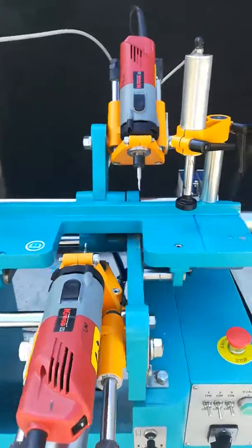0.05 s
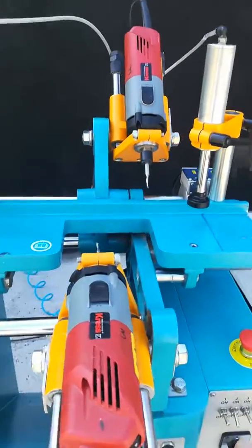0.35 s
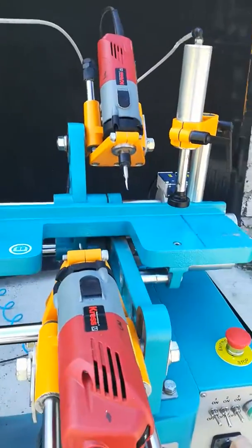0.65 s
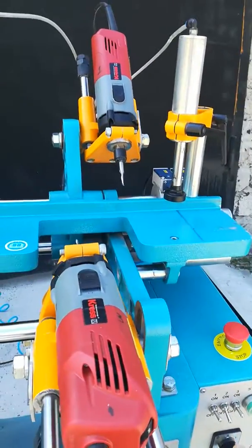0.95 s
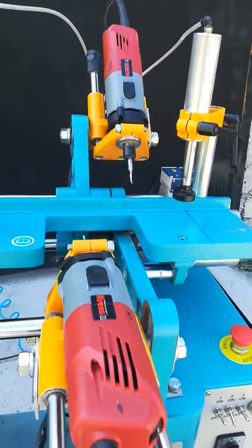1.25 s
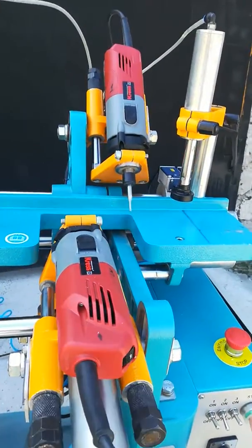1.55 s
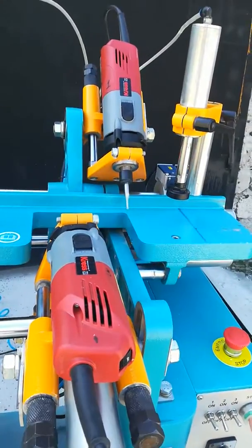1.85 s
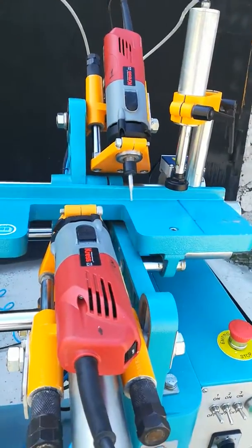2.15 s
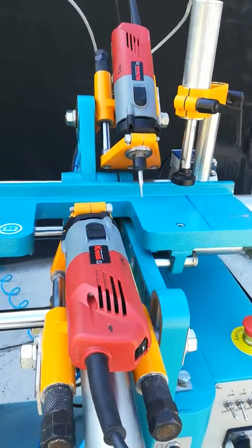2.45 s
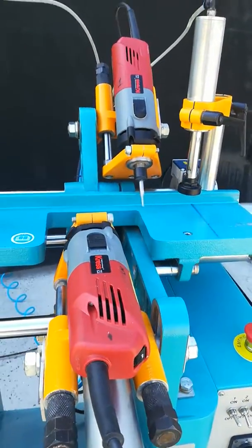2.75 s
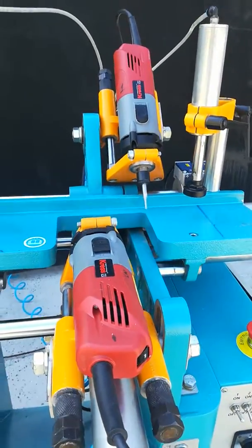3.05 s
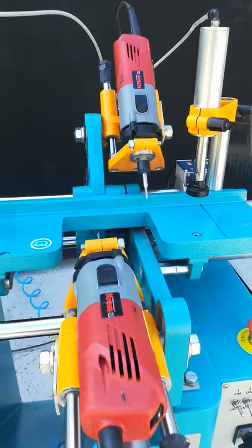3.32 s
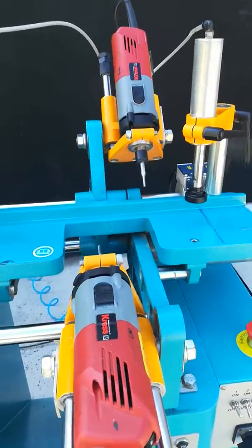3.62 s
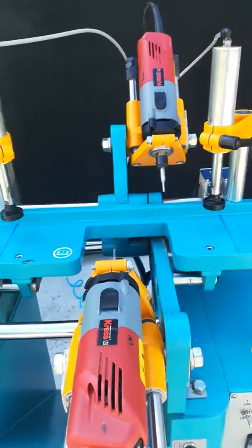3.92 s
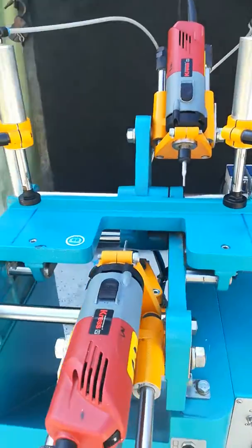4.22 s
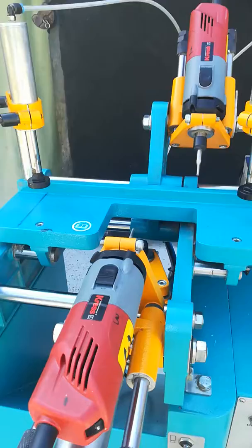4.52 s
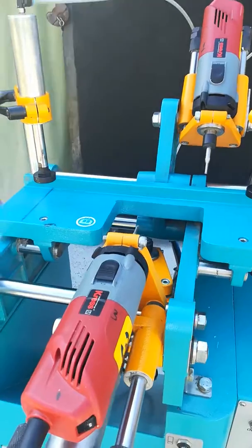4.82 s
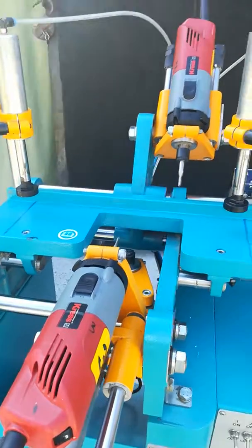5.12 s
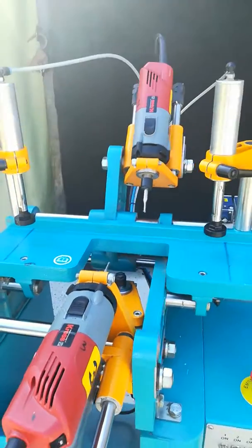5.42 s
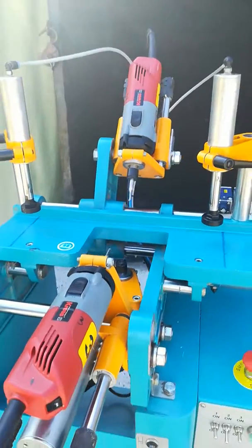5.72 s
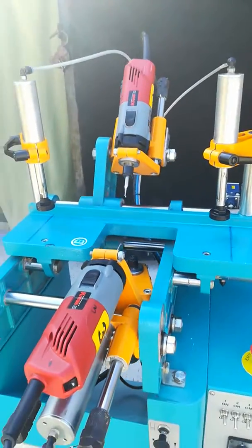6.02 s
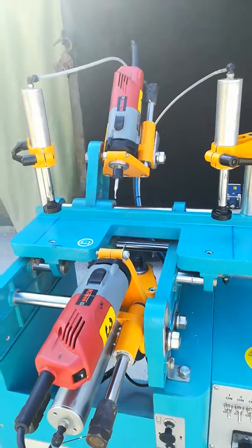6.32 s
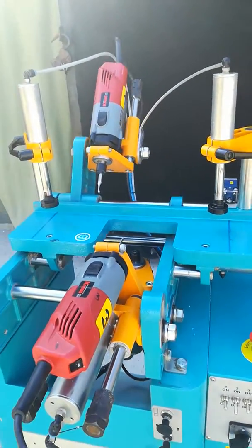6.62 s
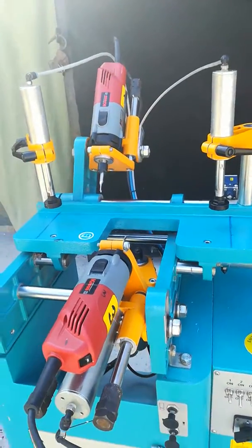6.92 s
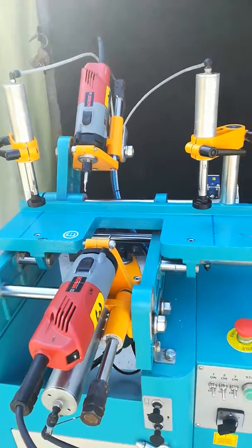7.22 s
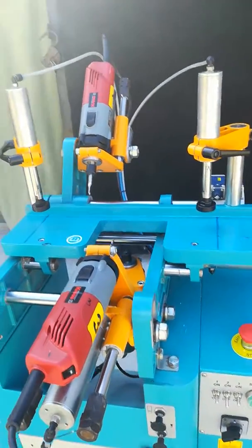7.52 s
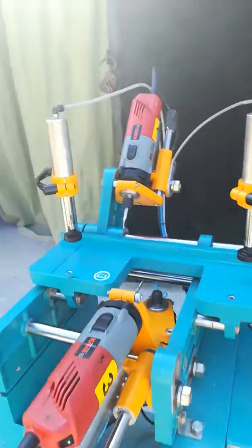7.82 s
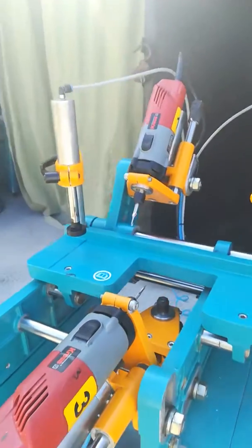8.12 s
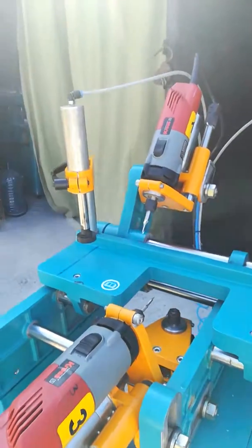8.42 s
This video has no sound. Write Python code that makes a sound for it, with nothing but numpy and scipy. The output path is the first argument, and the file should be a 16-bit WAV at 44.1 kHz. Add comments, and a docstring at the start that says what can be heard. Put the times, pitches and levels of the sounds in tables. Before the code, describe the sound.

In a quietly humming workshop, a few switches click and an air valve hisses briefly. With sharp clacks and a dull thud, three electric motors on a milling machine start together and rise to a high whine with rushing fan air. They soon cut out and coast down in a long falling whine with a light bearing rattle. Occasional clicks and soft knocks come from the machine, heard from just in front of it.

```python
"""A quiet workshop hums; switches clack, slides knock a milling machine's frame and an air valve hisses.
Three router motors then start together, whine up to about 27000 rpm and coast down against friction
and air drag. Their shaft orders and bearing tones sound through resonant end caps, over fan rush,
bearing rattle, unbalance hum and a thin rotor-slot whistle. The brushes rub until the shaft stands."""
import sys
import numpy as np
from scipy import signal
from scipy.fft import rfft, irfft, next_fast_len
from scipy.io import wavfile
from scipy.ndimage import uniform_filter1d

SR = 44100
rng = np.random.default_rng(int(sys.argv[2]) if len(sys.argv) > 2 else 0)


def dump(signal):
    """Clip the signal to [-1, 1] and save it as 16-bit WAV at the path in sys.argv[1]."""
    limited = np.clip(np.atleast_2d(signal).T, -1, 1)
    pcm = np.round(limited * 32767).astype(np.int16)
    wavfile.write(sys.argv[1], SR, pcm)


N = 377496
TIME_S = np.arange(N) / SR
HOLD_SAMPLES = 24
POWER_ON_S, POWER_OFF_S = 1.465, 2.977
BALL_PASSES_PER_TURN = 3.585

def undb(db):
    """Decibels to gain."""
    return 10 ** (np.asarray(db) / 20)

def at(points, hz):
    """Read a curve on a log-frequency axis."""
    freq_hz, value = np.transpose(points)
    return np.interp(np.log(np.maximum(hz, 1)), np.log(freq_hz), value)

def sides(left_db):
    """Stereo gains for a left-minus-right level."""
    gains = undb(np.array([[.5], [-.5]]) * left_db)
    return gains / np.sqrt(np.mean(gains ** 2, axis=0))

def colour(x, gain):
    """Filter by a function of frequency."""
    n = x.shape[-1]
    size = next_fast_len(n)
    return irfft(rfft(x, size) * gain(np.arange(size // 2 + 1) * SR / size), size)[..., :n]

def slow(x):
    """Audio rate to control rate."""
    return np.broadcast_to(x, N)[::HOLD_SAMPLES]

def held(x):
    """Control rate to audio rate."""
    return np.repeat(x.astype(np.float32), HOLD_SAMPLES)[:N]

def walk(rate_hz):
    """Smooth random wander, spread near 1."""
    count, span = N // HOLD_SAMPLES + 1, int(SR / HOLD_SAMPLES / rate_hz)
    steps = np.repeat(rng.standard_normal(count // span + 1), span)
    smooth = uniform_filter1d(steps, span)[:count]
    return held(smooth / smooth.std())

def fade(t, t60_s):
    """Exponential decay, 60 dB in t60_s."""
    return np.exp(-np.log(1000) * t / t60_s)

def add(out, start_s, x):
    """Mix a sound in at start_s."""
    i = int(start_s * SR)
    out[:, i:i + x.shape[1]] += x[:, :N - i]

# Likeness of left and right: freq_hz, correlation
LIKENESS = [(60, 0.98), (130, 0.97), (300, 0.78), (640, -0.37), (1400, 0.9), (3100, -0.24), (6800, 0.21),
            (15000, -0.027)]

def noise(spectrum, count=N, tilt_db_per_oct=0, ring_hz=1000, ring_db=0, ring_oct=.2):
    """Unit-rms stereo noise with one optional resonance; the sides are alike in the bass."""
    def gain(f):
        octaves = np.log2(np.maximum(f, 40) / ring_hz)
        peak_db = ring_db / (1 + (octaves / ring_oct) ** 2)
        return undb(at(spectrum, f) + tilt_db_per_oct * octaves + peak_db) * f / (f + 10)

    def part(weight):
        return colour(rng.standard_normal(count),
                      lambda f: gain(f) * np.sqrt(1 + weight * np.clip(at(LIKENESS, f), -.99, .99)))
    mid, side = part(.73), part(-1)
    stereo = np.array([mid + side, mid - side])
    return stereo / stereo.std()

def tone(angle_rad, hz, level_db, flutter_db=4.5):
    """A fluttering sine; short wavelengths reach the two sides out of step."""
    lag_rad = held(1.11 * np.arccos(np.clip(at(LIKENESS, slow(hz)), -1, 1)) * rng.choice([-1, 1]))
    turns = angle_rad / (2 * np.pi) + rng.random()
    phase = (2 * np.pi * (turns % 1)).astype(np.float32)
    gain = held(np.sqrt(2) * undb(slow(level_db) + flutter_db * slow(walk(35))))
    return gain * np.sin([phase + lag_rad / 2, phase - lag_rad / 2])

def room(x, t60_s, wet_db, lowpass_hz):
    """Add dense, dull reflections from the machine bed and walls."""
    t = TIME_S[:SR // 2]
    tail = noise([(20, 0), (20000, 0)], len(t)) * fade(t, t60_s) * np.minimum(t / .0072, 1)
    tail /= np.sqrt(np.sum(tail ** 2) / 2)
    tail = colour(tail, lambda f: 1 / np.hypot(1, f / lowpass_hz))
    return x + undb(wet_db) * signal.fftconvolve(x, tail, axes=1)[:, :N]

# Background noise: freq_hz, level_db
SHOP_SPECTRUM = [(15, -41), (25, -2), (55, -4), (91, -12), (156, -18), (178, -15), (598, -28.5),
                 (1020, -24), (1200, -25.5), (1490, -24.5), (1850, -25), (2920, -21.5), (6920, -24.5),
                 (9550, -31.5), (15500, -36.5)]
# Hums: pitch_hz, level_db
SHOP_HUMS = [(48.4, -77), (150.7, -65.5), (3564, -67.5), (6713, -72)]

def workshop(noise_db=-51):
    """Quiet rumble and hiss with a few hums of steady pitch."""
    hum = sum(tone(2 * np.pi * hz * TIME_S, hz, level_db) for hz, level_db in SHOP_HUMS)
    return noise(SHOP_SPECTRUM) * undb(noise_db + .5 * walk(7)) + hum

# Clack noise: freq_hz, level_db
CLACK_SPECTRUM = [(100, -21), (300, -11), (550, -9.5), (1000, 0.5), (1600, -2), (2300, -6), (3200, 0),
                  (4100, -6), (5200, -12), (7000, -20.5), (9000, -18.5), (15000, -46)]
# Clacks of switches and valves, and longer slide rattles and scrapes: start_s, level_db, t60_s,
# tilt_db_per_oct, ring_hz, left_db
CLACKS = [(0.115, -25, 0.042, -2, 1800, -3), (.125, -38.5, 0.97, -1, 1870, 1),
          (.259, -29, 0.015, -6, 1490, -8), (.558, -41.5, 0.49, -1.5, 1970, 1),
          (1.2082, -21.5, 0.1, -1, 2650, -22), (1.218, -13, 0.057, -1.5, 3500, -9),
          (1.428, -8, 0.021, 1.5, 1520, -1), (1.487, -6, 0.036, -3, 3020, -7.5),
          (3.436, -7, 0.019, 2.5, 4700, 1), (4.9916, -8.5, 0.026, 2.5, 5600, -8),
          (6.6372, -14, 0.046, -1.5, 2250, -10), (7.268, -47, 0.12, -2, 1850, -6),
          (7.561, -46, 0.12, 1, 1130, -18), (7.84, -45, .03, 5, 2000, 3)]

def switches(contact_s=.0012, after_ring_db=-27.5):
    """Hard parts meet, clack and ring on faintly into the workshop."""
    out, t = np.zeros((2, N)), TIME_S[:SR // 4]
    attack = np.minimum(t / contact_s, 1)
    for start_s, level_db, t60_s, tilt_db_per_oct, ring_hz, left_db in CLACKS:
        ring = noise(CLACK_SPECTRUM, len(t), tilt_db_per_oct, ring_hz, ring_db=9.5, ring_oct=.28)
        decay = fade(t, t60_s) + undb(after_ring_db) * fade(t, 3.7 * t60_s)
        add(out, start_s, ring * attack * decay * undb(level_db) * sides(left_db))
    return room(out, t60_s=.44, wet_db=-6, lowpass_hz=4700)

# Frame thud: freq_hz, level_db
THUD_SPECTRUM = [(30, -5), (60, -2), (90, 4), (125, -4.5), (170, -13.5), (245, -6), (330, -11), (500, -9),
                 (1000, -6.5), (3000, -32)]
# Slide knocks: start_s, level_db, t60_s, boom_hz
KNOCKS = [(0.129, -40, 0.76, 283), (0.569, -41, 0.78, 277), (.752, -31, 0.067, 51),
          (.782, -32, 0.076, 56.4), (0.882, -43, 0.32, 95), (1.009, -41.5, 1, 198),
          (1.219, -27.5, 0.18, 200), (1.436, -21, 0.49, 220), (1.494, -21, 0.68, 204), (1.53, -22, 1, 92),
          (2.526, -34, 0.54, 177), (3.245, -31, 0.66, 178), (3.442, -23, 0.46, 234),
          (3.492, -31.5, 0.77, 96), (3.681, -30.5, 0.54, 181), (4.31, -37, 0.44, 260),
          (4.776, -34.5, 0.77, 260), (5.008, -34.5, 0.61, 292), (6.654, -30.5, 0.52, 260),
          (6.685, -31.5, 0.91, 102), (7.077, -48, 0.31, 112)]

def frame_knocks(attack_s=.0095):
    """Knocks of the slides swell in the steel frame and boom away."""
    out, t = np.zeros((2, N)), TIME_S[:SR // 2]
    for start_s, level_db, t60_s, boom_hz in KNOCKS:
        boom = noise(THUD_SPECTRUM, len(t), ring_hz=boom_hz, ring_db=22, ring_oct=1)
        add(out, start_s, boom * fade(t, t60_s) * np.minimum(t / attack_s, 1) * undb(level_db))
    return out

# Air hiss: freq_hz, level_db
VALVE_SPECTRUM = [(100, -6), (350, -10.5), (600, -6.5), (1500, -7.5), (2500, -4), (3700, -4.5), (5200, -10),
                  (8000, -22), (15000, -30)]

def air_valve(open_s=1.21, shut_s=1.515, attack_s=.026, level_db=-31):
    """Air hisses into a cylinder and dies away once the valve shuts."""
    attack = np.clip((TIME_S - open_s) / attack_s, 0, 1)
    release = fade(np.maximum(TIME_S - shut_s, 0), t60_s=.73)
    return noise(VALVE_SPECTRUM) * attack * release * undb(level_db + walk(40.3)) * sides(-1.2)

def shaft(motor, wobble, stall_hz=30):
    """Speed and angle of a slightly uneven shaft: run-up, governed speed, coast-down."""
    free_hz, run_up_s, governed_hz, friction_hz_per_s, drag_equals_friction_hz = motor
    rising_hz = free_hz * (1 - np.exp(-(TIME_S - POWER_ON_S) / run_up_s))
    braking = friction_hz_per_s / drag_equals_friction_hz * np.maximum(TIME_S - POWER_OFF_S, 0)
    coast_hz = drag_equals_friction_hz * np.tan(np.arctan(governed_hz / drag_equals_friction_hz) - braking)
    hz = np.maximum(np.minimum(rising_hz, coast_hz), 0)
    hz *= 1 - 1 / (1 + (hz / stall_hz) ** 4)  # the brushes grab
    angle_rad = 2 * np.pi * np.cumsum(hz * (1 + wobble * walk(90))) / SR
    return hz, angle_rad

def torque(hz, full_hz_per_s=1320):
    """Share of full starting torque, from the shaft's acceleration."""
    hz_per_s = uniform_filter1d(np.gradient(hz), SR // 20) * SR
    return np.clip(hz_per_s / full_hz_per_s, 0, .7)

def vibration_db(hz, knee_hz, steepness=1):
    """Vibration is even at high speed and dies away as the shaft slows."""
    rolloff_db = -10 * steepness * np.log10(1 + (knee_hz / (hz + .00087)) ** 2)
    return rolloff_db + 20 * np.log10(np.clip(hz / 40, 1e-4, 1))

def motor_tones(hz, angle_rad, tones, slacken_s=.06, ball_slip=.04, swell_db=3, swing_db=4):
    """Ball-pass and shaft tones; torque makes the balls skid and screech."""
    load = np.exp(-np.maximum(TIME_S - POWER_OFF_S, 0) / slacken_s)
    pull = torque(hz)
    speed_db = vibration_db(hz, knee_hz=245, steepness=3)
    skid_rad = 2 * np.pi * np.cumsum(ball_slip * pull ** 2 * hz) / SR
    ball_rad = BALL_PASSES_PER_TURN * (angle_rad - skid_rad)
    out = 0
    for ball_order, shaft_order, level_db, load_db, torque_db in tones:
        line_db = level_db + speed_db + load_db * load + torque_db * pull + swell_db * walk(9)
        line_hz = (ball_order * BALL_PASSES_PER_TURN + shaft_order) * hz
        line = tone(ball_order * ball_rad + shaft_order * angle_rad, line_hz, line_db, flutter_db=2.5)
        out += line * sides(swing_db * walk(6))  # standing waves swing it sideways
    return out

# End cap and mount modes: freq_hz, width_hz, gain_db
END_CAP_MODES = [(243, 26, -17.5), (550, 95, -36.0), (852, 53, -29.5), (1161, 183, -32.0),
                 (1444, 129, -27.0), (1813, 100, -24.0), (2136, 170, -28.0), (2422, 185, -27.0),
                 (2698, 85, -27.0), (2991, 92, -26.5), (3175, 230, -17.5), (3773, 170, -36),
                 (4130, 200, -30), (5113, 316, -40.5), (6060, 548, -36.5)]

def end_cap(x):
    """Tones flare as they sweep through the end cap's modes."""
    def gain(f):
        modes = (undb(db) / (1 + ((f - hz) / width_hz) ** 2) for hz, width_hz, db in END_CAP_MODES)
        return np.sqrt(sum(mode ** 2 for mode in modes))
    return colour(x, gain)

# Response of the thin metal parts: freq_hz, gain_db
THIN_METAL_RESPONSE = [(2000, -64), (5500, -50), (7500, -45), (9100, -32), (10300, -46), (11800, -49),
                       (12900, -42), (14200, -34), (15600, -37)]

def slot_whistle(hz, angle_rad, level_db, knee_hz=89, slots=40):
    """Rotor slots whistle through thin metal parts, faintly under starting torque."""
    speed_db = at(THIN_METAL_RESPONSE, slots * hz) + vibration_db(hz, knee_hz)
    power_db = 10 * (TIME_S < POWER_OFF_S) - 85 * torque(hz) ** 2
    return tone(slots * angle_rad, slots * hz, level_db + speed_db + power_db, flutter_db=2)

# Frame response to unbalance: freq_hz, gain_db
FRAME_RESPONSE = [(40, -56), (120, -60), (165, -53), (215, -50), (243, -41), (269, -48), (297, -41),
                  (325, -49), (355, -46), (420, -46), (433, -36), (448, -32), (465, -28)]

def unbalance(hz, angle_rad, level_db):
    """Once-a-turn hum, strongest at the frame's resonances."""
    hum = tone(angle_rad, hz, level_db + at(FRAME_RESPONSE, hz), flutter_db=3.5)
    return hum * np.minimum(hz / 40, 1)

# Fan noise: freq_hz, level_db
FAN_SPECTRUM = [(60, -44), (190, -19), (380, -18.5), (560, -44), (800, -15.5), (1150, -1.5), (1550, 2.5),
                (2050, -7), (3400, -4), (4500, -7), (5150, -5.5), (6500, -11.5), (8400, -16), (13500, -26),
                (15500, -35.5)]

def fan_rush(hz, angle_rad, full_hz=452, full_db=-14.5, db_per_decade=46):
    """Fan air grows steeply with speed and pulses once a turn."""
    level_db = full_db + db_per_decade * np.log10(np.maximum(hz, 1) / full_hz)
    rush = noise(FAN_SPECTRUM, ring_hz=1535, ring_db=-1.5, ring_oct=.13)
    return rush * undb(level_db + .5 * walk(18)) * (1 + .043 * np.cos(angle_rad))

# Housing modes: freq_hz, width_hz, level_db
HOUSING_MODES = [(3325, 410, -3.5), (6040, 430, -12)]

def housing_ring():
    """Random ball impacts ring the housing modes, each swelling on its own."""
    out = 0
    for hz, width_hz, level_db in HOUSING_MODES:
        mode = colour(rng.standard_normal((2, N)), lambda f: 1 / (1 + ((f - hz) / width_hz) ** 2))
        out += mode / mode.std() * undb(level_db + 2 * walk(25))
    return out

def brush_rub(hz, housing, level_db=-39, fade_below_hz=53.5):
    """The brushes rub until the shaft stands."""
    return housing * undb(level_db) * np.minimum(hz / fade_below_hz, 1)

# Bearing noise: freq_hz, level_db
RATTLE_SPECTRUM = [(60, -58), (105, 2), (170, -19), (280, -6), (420, -42), (700, -2), (1350, 2),
                   (2100, -11), (3000, -21.5), (3800, -21), (4600, -9), (6000, -3.5), (7500, -19.5),
                   (15500, -55)]

def bearing_rattle(hz, angle_rad, housing, base_db=-28, torque_db=8):
    """A burst as each ball rolls by, louder under starting torque."""
    level_db = base_db + vibration_db(hz, knee_hz=233, steepness=1.77) + torque_db * torque(hz)
    bursts = (1 + .5 * np.cos(BALL_PASSES_PER_TURN * angle_rad)) * (1 + .25 * np.cos(angle_rad))
    return (noise(RATTLE_SPECTRUM) + housing) * undb(level_db + walk(30)) * bursts

# Motors A, B, C: free_hz, run_up_s, governed_hz, friction_hz_per_s, drag_equals_friction_hz
MOTORS = [(506.8, .384, 452, 88.16, 567.2), (522, .397, 460, 89.55, 579), (469, .36, 433.3, 137.4, 850)]
# Tones per motor (A, C have worn bearings): ball_order, shaft_order, level_db, load_db, torque_db
TONES_A = [(1, 0, 10.0, 0, 6), (2, 0, 3.5, -15, 34), (3, 0, 5.5, -2, 7), (4, 0, 6.5, -16, 22),
           (5, 0, 1.5, -5, 10), (6, 0, 3.0, -4, 5), (7, 0, 1.5, -1, 10), (8, 0, -2.0, -4, 7),
           (9, 0, 6.0, -3, 8), (10, 0, 8.0, -4, 7), (11, 0, -2.5, -1, 10), (12, 0, 5.5, -3, 8),
           (14, 0, 6.5, 0, 10), (1, 1, -3.0, -5, 14), (2, 1, -5.0, 2, -20), (3, 1, -5.5, 8, -3),
           (3, 2, -6.5, -4, 14), (4, 2, -6.0, -1, 7), (0, 4, -0.5, -8, 17), (0, 5, -11.0, 3, 10),
           (0, 12, -5.5, 13, -8), (0, 24, 7.0, -2, 8)]
TONES_B = [(0, 12, -12.5, 13, 4)]
TONES_C = [(1, 0, -6.5, -2, 17), (2, 0, -5.0, -13, 47), (3, 0, -5.0, -8, 30), (1, 1, -7.0, -4, -2),
           (0, 12, -8.0, 10, -5), (0, 24, 5.5, -3, 6)]
# Stereo balance of the motors: freq_hz, left_db
MOTOR_BALANCE = [(200, 7.5), (400, 9.5), (700, -3), (1300, 7), (2400, 2.5), (4400, 4.5), (8100, 8.5),
                 (15000, 2)]

def motors(start_left_db=-5, drift_db_per_s=-1.07):
    """Three motors at slightly different speeds; the machine drifts to the right."""
    a = shaft(MOTORS[0], wobble=.000774)
    b = shaft(MOTORS[1], wobble=.0006)
    c = shaft(MOTORS[2], wobble=.002)
    whine = end_cap(motor_tones(*a, TONES_A) + motor_tones(*b, TONES_B) + motor_tones(*c, TONES_C))
    whine = room(whine, t60_s=.93, wet_db=-17.5, lowpass_hz=7860) * sides(-1.5)
    whine += slot_whistle(*a, level_db=1) + slot_whistle(*b, level_db=-17)
    whine += slot_whistle(*c, level_db=2, knee_hz=330)
    hum = unbalance(*a, level_db=2.5) + unbalance(*b, level_db=-18.5) + unbalance(*c, level_db=1.5)
    fan = fan_rush(hz=a[0], angle_rad=b[1])
    housing = housing_ring()
    mix = whine + hum + fan + brush_rub(a[0], housing) + bearing_rattle(*a, housing)
    left_db = start_left_db + drift_db_per_s * (TIME_S - POWER_ON_S)
    return colour(mix, lambda f: sides(at(MOTOR_BALANCE, f))) * sides(left_db)

def scene():
    """Everything heard from in front of the machine."""
    return motors() + switches() + frame_knocks() + air_valve() + workshop()

def record(dry):
    """Clip at full scale and cut the top treble."""
    cutoff_hz = 15800
    lowpass = signal.ellip(10, .2, 80, cutoff_hz, fs=SR, output="sos")
    return signal.sosfilt(lowpass, np.clip(dry, -1, 1))

dry = scene()
out = record(dry)
dump(out)
```